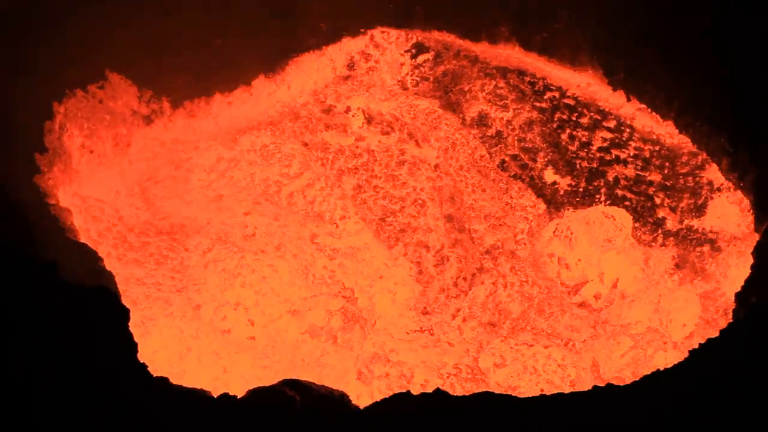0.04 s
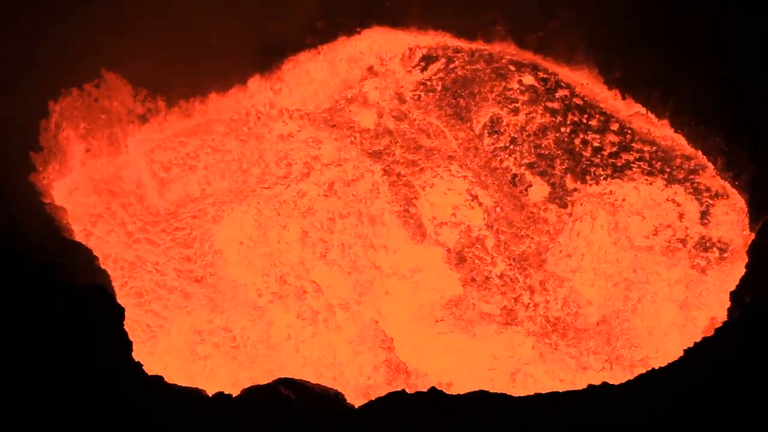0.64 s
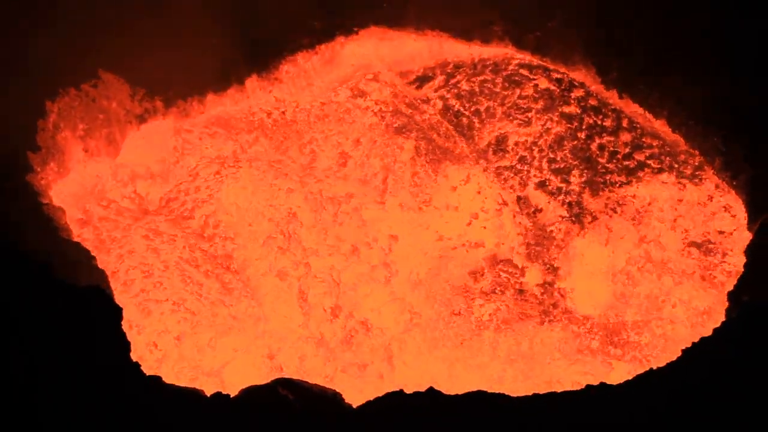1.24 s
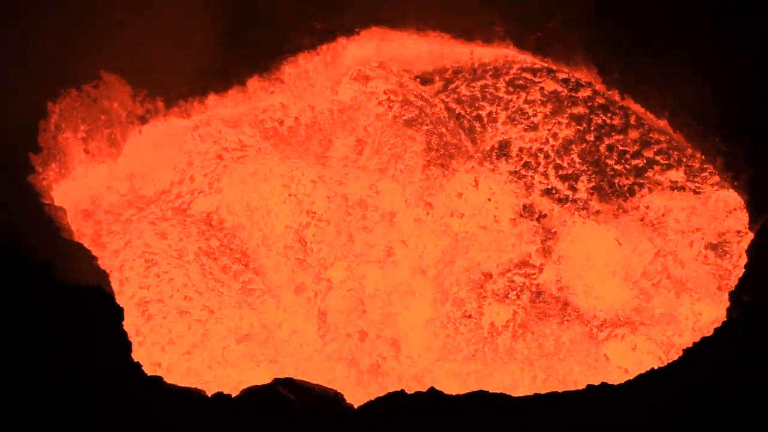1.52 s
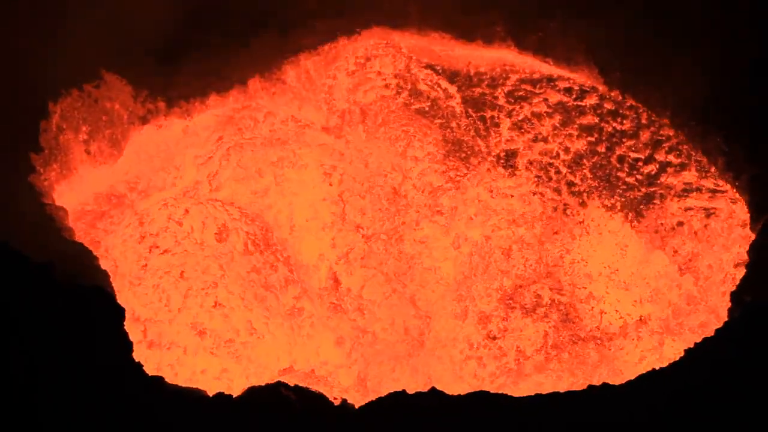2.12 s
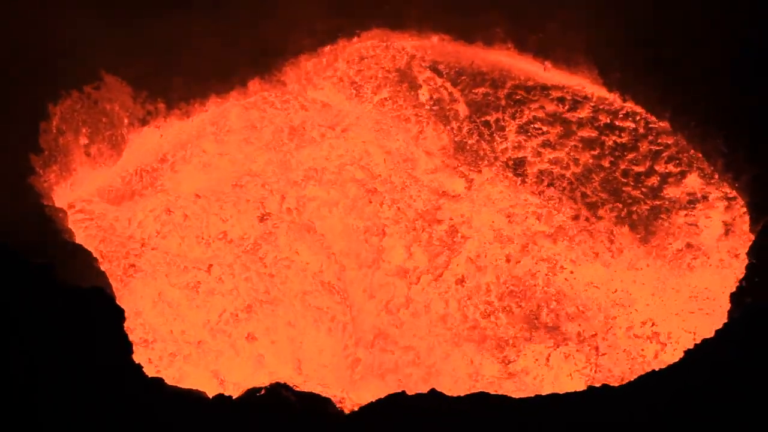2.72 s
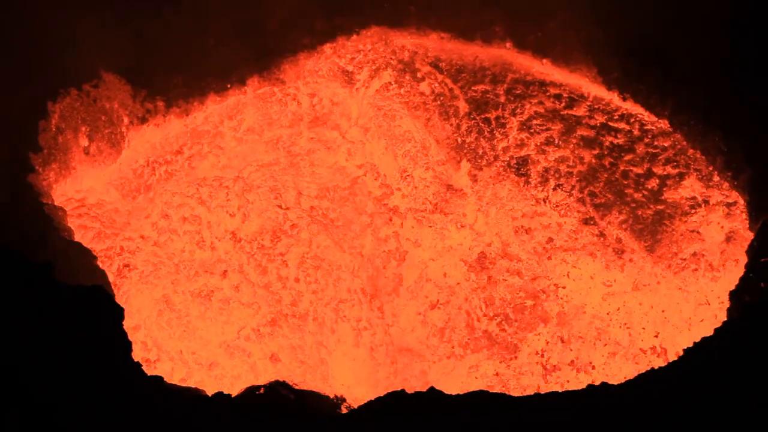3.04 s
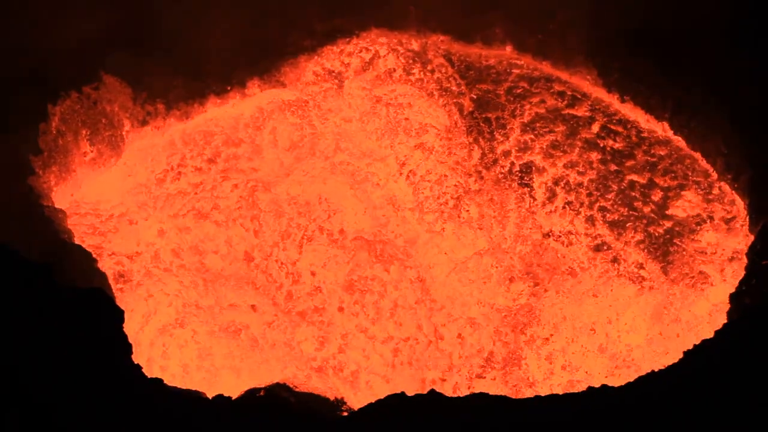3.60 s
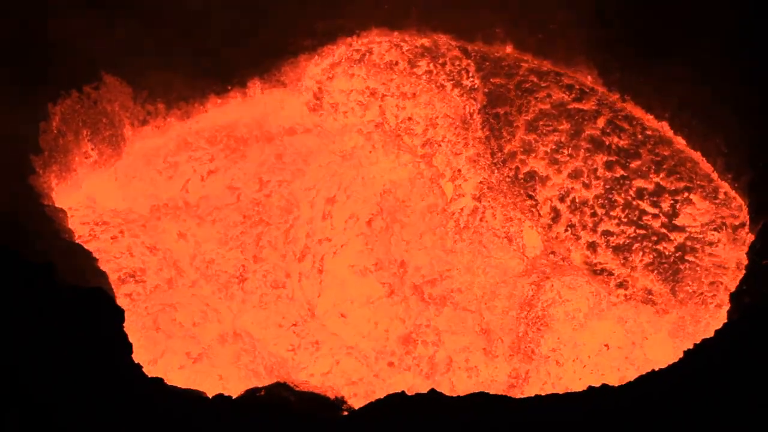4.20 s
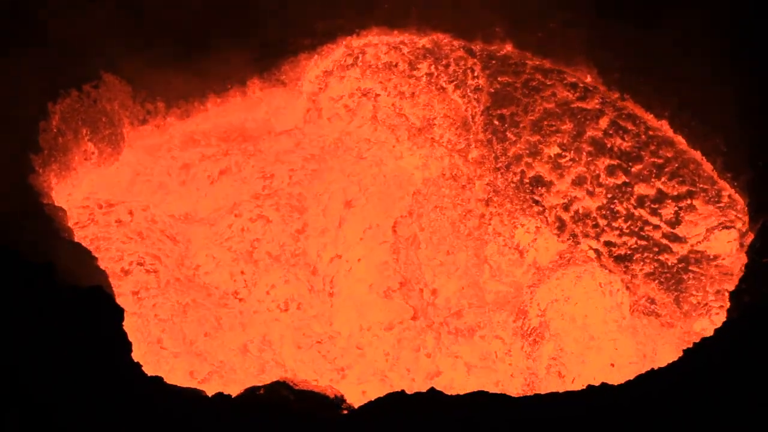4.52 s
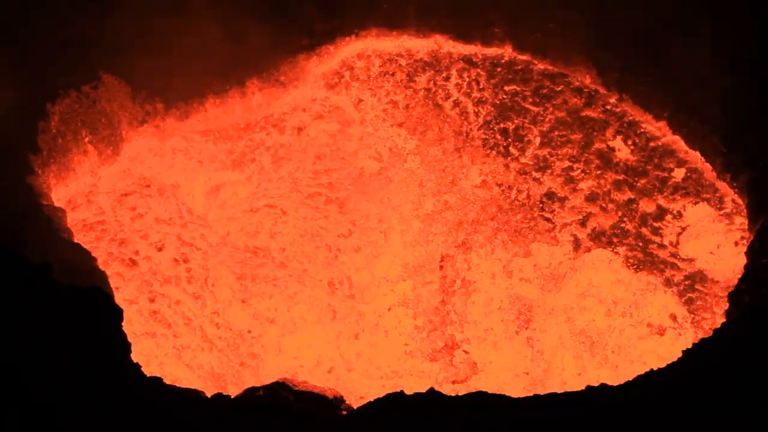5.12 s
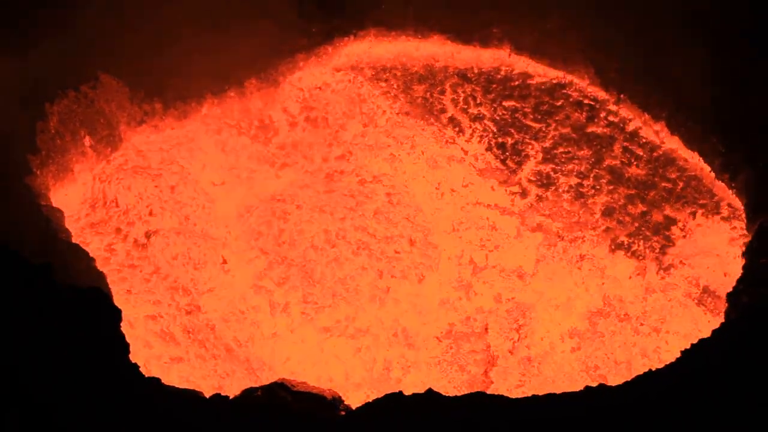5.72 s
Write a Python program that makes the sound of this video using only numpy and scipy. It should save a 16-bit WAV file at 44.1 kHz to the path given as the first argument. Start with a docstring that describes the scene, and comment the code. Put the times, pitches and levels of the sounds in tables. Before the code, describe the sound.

At the rim of a volcano crater, a lava lake churns with a low roar that swells in surges, with soft splashing on top. Wind rumbles on the microphone, building after a second and a half into hard, thumping gusts that push the lake back. The wind eases briefly, then returns at the end. Faint scuffs and ticks of loose grit sound close by, mostly on the left, over a thin hiss.

```python
"""Lava lake in the wind

A lava lake churns in its crater: bursting gas roars in surges, with splashes of melt on top.
Close by, mostly to the left, loose grit scuffs and ticks over a steady hiss.
Gusts rumble and thump on the microphone at the rim. The recorder turns everything down
under the strong gusts, and the hardest eddies (swirls of air) overload it."""
import sys
import numpy as np
from scipy import signal
from scipy.fft import rfft, irfft
from scipy.io import wavfile
from scipy.ndimage import uniform_filter1d, minimum_filter1d

SR = 44100
rng = np.random.default_rng(int(sys.argv[2]) if len(sys.argv) > 2 else 0)


def to_wav(sig):
    """Store sig (one row per channel, or 1-D mono) as 16-bit WAV at the path in sys.argv[1].

    Samples outside -1..1 are clipped; the rate is SR.
    """
    pcm = np.clip(np.atleast_2d(sig), -1, 1) * 32767
    pcm = np.round(pcm).astype(np.int16)
    wavfile.write(sys.argv[1], SR, pcm.T)  # frames by channels


N = 262395
T = np.arange(N) / SR
HZ = np.fft.rfftfreq(N, 1 / SR)

# The pitch range in which each named layer's level is set: lowest_hz, highest_hz
BANDS = {"wind": (0, 400), "flutter": (130, 600), "roar": (330, 1500), "splash": (1300, 4500),
         "hiss": (10500, 15800)}


def amp(db):
    """Turns decibels into a factor to multiply by."""
    return 10 ** (np.asarray(db) / 20)


def unit(x):
    """Scales a signal to an average (rms) level of 1."""
    return x / np.sqrt(np.mean(x ** 2) + 1e-20)


def curve(points):
    """Joins (pitch, value) points with straight lines on a scale of octaves."""
    pitch_hz, value = np.transpose(points)
    return np.interp(np.log(HZ + 1), np.log(pitch_hz + 1), value)


def add(mix, start_s, sound):
    """Mixes in a stereo sound at the given time."""
    part = mix[:, max(round(start_s * SR), 0):][:, :sound.shape[1]]
    part += sound[:, :part.shape[1]]


def pair(unrelated, likeness):
    """Makes left and right from two signals: likeness 0 is wide, 1 is centred."""
    likeness = np.clip(likeness, 0, .999)
    mid = unrelated[0] * np.sqrt((1 + likeness) / 2)
    side = unrelated[1] * np.sqrt((1 - likeness) / 2)
    return np.array([mid + side, mid - side])


def lean(left_db):
    """Gains that make the left side louder than the right by left_db."""
    return amp([[left_db / 2], [-left_db / 2]])


def coloured(noise, colour, likeness, band_hz):
    """Gives noise a tone colour and a stereo width, at level 1 within the band."""
    spectrum = pair(rfft(noise), likeness) * amp(curve(colour))
    inside = spectrum[:, (HZ >= band_hz[0]) & (HZ <= band_hz[1])]
    return irfft(spectrum, N) * N / np.linalg.norm(inside)


def white():
    """Two channels of white noise."""
    return rng.standard_normal((2, N))


def wander(rate_hz):
    """A smooth random wobble of level 1."""
    return unit(irfft(rfft(rng.standard_normal(N)) * np.exp(-(HZ / rate_hz) ** 2), N))


def steadied(x, span_s):
    """Evens out the level of noise over stretches longer than span_s."""
    window = np.hanning(max(int(span_s * SR), 64))
    power = signal.fftconvolve((x ** 2).mean(0), window, "same")
    power /= signal.fftconvolve(np.ones(N), window, "same")
    return x / np.sqrt(abs(power) + 1e-9)


def hiss():
    """A wide, smooth, steady hiss."""
    # Tone of the hiss: pitch_hz, level_db
    colour = [(500, -26.5), (3000, 3.5), (5500, 3), (8000, 2.5), (10500, 1), (13000, 1), (15700, 0),
              (16200, -8)]
    return coloured(white(), colour, likeness=0.15, band_hz=BANDS["hiss"]) * amp(-57) * lean(left_db=0.6)


def scuffs():
    """Sliding grit makes a short sputtering hiss that swells and fades."""
    # Slides of grit: peak_s, level_db, length_s, pitch_hz, width_octaves, left_minus_right_db
    slides = [(.230, -38, 0.032, 7600, 0.82, -3), (0.325, -39, 0.017, 4000, 0.93, -6),
              (1.419, -46, 0.15, 4800, .8, 0), (1.704, -35.5, .013, 2630, 1.06, 4),
              (1.737, -40, 0.024, 5000, .9, 1), (4.116, -36.5, 0.044, 3550, 2.7, 4),
              (4.739, -44, 0.24, 4200, 2.4, 3), (4.864, -47.5, 0.041, 6400, .6, 3),
              (5.143, -27.5, 0.022, 2920, 3.6, 5.5), (5.185, -37, .065, 3200, 1.6, 5),
              (5.263, -38, .014, 2400, 1.5, 1)]
    out = np.zeros((2, N))
    t = np.arange(2 ** 14) / SR
    hz, middle_s = np.fft.rfftfreq(len(t), 1 / SR), t.mean()
    for peak_s, level_db, length_s, pitch_hz, octaves, left_db in slides:
        sputter_db = 2.5 * unit(uniform_filter1d(rng.standard_normal(len(t)), size=60))
        grains = rng.standard_normal((2, len(t))) * amp(sputter_db)
        band = np.exp(-.5 * (np.log2((hz + 1) / pitch_hz) / octaves) ** 2) / np.sqrt(hz + 500)
        slide = unit(irfft(pair(rfft(grains), likeness=0.7) * band, len(t)))
        swell = np.exp(-2 * ((t - middle_s) / length_s) ** 2)
        add(out, peak_s - middle_s, amp(level_db) * slide * swell * lean(left_db))
    return out


def ticks():
    """Brittle grains crack: a few milliseconds of ring with a faint scatter after it."""
    # Single cracking grains: start_s, level_db, pitch_hz
    grains = [(1.048, -47, 3430), (1.169, -45, 5000), (1.215, -41.5, 4830), (1.419, -38, 2600),
              (1.703, -31.5, 2420), (1.752, -40, 4500), (3.863, -41, 4830), (4.098, -35.5, 2940),
              (4.685, -57, 3360), (4.705, -36, 2900), (4.73, -32, 3220), (4.75, -39, 4840),
              (4.774, -39, 2970), (5.144, -27.5, 1450), (5.171, -33, 3400), (5.192, -32, 2650),
              (5.247, -37, 2970), (5.266, -33, 2120), (5.319, -37, 4020), (5.456, -45, 5200)]
    out = np.zeros((2, N))
    t = np.arange(SR // 20) / SR
    decay = np.exp(-t / .0025) + .10 * np.exp(-t / .012)
    for start_s, level_db, pitch_hz in grains:
        crack = pair(rng.standard_normal((2, len(t))), likeness=0.72) * decay
        band_hz = [pitch_hz / 1.4, min(pitch_hz * 1.4, SR / 2.2)]
        body = signal.butter(2, band_hz, "bandpass", fs=SR, output="sos")
        ring = signal.sosfilt(body, crack) + 0.033 * crack
        opening_level = np.sqrt(np.mean(ring[:, t < .003] ** 2))
        add(out, start_s, amp(level_db) * ring / opening_level)
    return out * lean(left_db=10.5)


def grit():
    """Scuffs and ticks share one crisp tone colour."""
    # Tone of the grit: pitch_hz, gain_db
    colour = [(500, 0), (3100, -3.5), (3800, -9), (4600, -4), (5700, -8.5), (7900, -4), (9500, -8),
              (15500, -13)]
    return irfft(rfft(scuffs() + ticks()) * amp(curve(colour)), N)


def lake():
    """Bursting gas roars in the crater; dense splashes of melt ride on top."""
    # Surges of gas through the melt: peak_s, half_length_s, roar_rise_db, splash_rise_db
    surges = [(.0, .05, 4.5, 1), (0.31, 0.2, 4, 8), (1.048, 0.039, 2.5, 3), (1.5, 0.23, 2.8, 6),
              (2.046, 0.37, 0.5, 5), (2.534, 0.17, 10.5, 13), (3.74, 0.22, 5, 5.5), (4.11, 0.12, 5.5, 3),
              (4.503, 0.16, 2, -2.5), (4.923, 0.13, 4, 0), (5.39, 0.19, 4, 5.5), (5.82, 0.18, 6, 6)]
    # Tone of the roar: pitch_hz, level_db
    roar_colour = [(20, -9.5), (100, 5), (190, 13), (280, 5.5), (380, 2), (550, 0), (680, -5.5),
                   (820, -4.5), (1200, -10), (1800, -15.5), (3000, -24), (6000, -35), (16000, -71)]
    # Tone of the splashes: pitch_hz, level_db
    splash_colour = [(300, -8), (900, 2.5), (1600, 5), (2400, 0.5), (3200, -6.5), (3900, -10.5),
                     (4700, -12), (5700, -22.5), (7600, -24.5), (10000, -26.5), (16000, -26.5)]
    # How alike left and right are: pitch_hz, likeness (0 to 1)
    lake_likeness = [(100, 1), (600, 0.95), (1500, .93), (3000, 0.93), (8000, 0.97)]
    steady_roar_db, steady_splash_db, drops_per_s = -38.5, -50.5, 2500
    roar_rise_db, splash_rise_db = sum(np.outer(rises_db, np.exp(-((T - peak_s) / half_s) ** 2))
                                       for peak_s, half_s, *rises_db in surges)
    likeness = curve(lake_likeness)
    churn = wander(rate_hz=9.4)  # the boiling surface shakes roar and splashes together
    roar = coloured(white(), roar_colour, likeness, BANDS["roar"])
    roar *= amp(steady_roar_db + roar_rise_db + 0.16 * churn)
    drops = white() * (rng.random(N) < drops_per_s / SR)
    drops *= amp(7.7 * np.minimum(rng.exponential(1, N), 3))  # many soft, a few loud
    splash = coloured(white() + .5 * unit(drops), splash_colour, likeness, BANDS["splash"])
    splash *= amp(steady_splash_db + splash_rise_db + 1.5 * churn + .5 * wander(rate_hz=160))
    return roar * lean(left_db=2.0) + splash * lean(left_db=0.9)


def gusts():
    """Strength of the wind's three layers: each gust swells, holds and drops back into the breeze."""
    # The breeze between gusts: slow_eddies_db, fast_eddies_db, flutter_db
    breeze_db = (-25.5, -30, -43.5)
    # Gusts on the microphone: peak_s, half_length_s, slow_eddies_db, fast_eddies_db, flutter_db
    blasts = [(0.413, 0.049, -15, -21.5, -33), (0.713, 0.18, -16.5, -30, -45), (1.071, 0.11, -14, -27, -38),
              (1.325, 0.16, -20.5, -42, -56), (1.584, 0.14, -11.5, -12.5, -27), (1.897, 0.18, -8, -16, -26),
              (2.174, 0.098, -6.5, -14, -23.5), (2.427, 0.076, -3.5, -13.5, -20.5),
              (2.675, 0.16, -4.5, -12, -28), (2.978, 0.098, -4, -15.5, -23.5), (3.18, 0.1, -7, -3, -11.5),
              (3.395, 0.085, -3, -15, -25.5), (3.521, 0.12, -17, -9, -21), (3.786, 0.17, -11.5, -19, -58),
              (4.105, 0.056, -4, -15, -26.5), (4.234, 0.081, -4, -13, -22), (4.446, 0.16, -14.5, -18, -38),
              (4.81, 0.14, -21, -23.5, -54), (5.681, 0.098, -13.5, -15, -24.5),
              (5.792, 0.053, -4.5, -13.5, -16.5), (5.921, 0.063, -2.5, -11.5, -34)]
    squareness = 3.26  # 2 is a bell shape; more gives a flatter top and steeper sides
    power = amp(breeze_db)[:, None] ** 2 * np.ones(N)
    for peak_s, half_s, *levels_db in blasts:
        swell = np.exp(-np.minimum(abs((T - peak_s) / half_s), 2) ** squareness)
        power += (amp(levels_db)[:, None] * swell) ** 2
    return np.sqrt(power)


def wind():
    """Large eddies press on both microphone openings alike; each opening also flutters on its own."""
    # Tone of the slow eddies: pitch_hz, level_db
    slow_colour = [(5, 2.5), (15, -4), (28, -2), (52, -1), (72, -9.5), (110, -29.5), (250, -64.5),
                   (900, -100)]
    # Tone of the fast eddies: pitch_hz, level_db
    fast_colour = [(30, -19.5), (55, -10), (80, 0.5), (118, -4.5), (160, -11.5), (220, -19.5), (320, -31),
                   (500, -53.5), (1200, -63.5), (4000, -100)]
    # Tone of the flutter: pitch_hz, level_db
    flutter_colour = [(50, -22), (115, 0), (190, -1), (300, -10), (450, -26), (800, -40.5), (2000, -55),
                      (6000, -90.5)]
    # How alike left and right are: pitch_hz, likeness (0 to 1)
    wind_likeness = [(20, 1), (60, 0.95), (125, 0.92), (250, 1), (600, 0.36)]
    slow_gain, fast_gain, flutter_gain = gusts()
    likeness = curve(wind_likeness)
    slow = steadied(coloured(white(), slow_colour, likeness, BANDS["wind"]), span_s=0.034) * slow_gain
    fast = steadied(coloured(white(), fast_colour, likeness, BANDS["wind"]), span_s=0.16) * fast_gain
    flutter = steadied(coloured(white(), flutter_colour, 0, BANDS["flutter"]), span_s=0.08)
    flutter *= flutter_gain
    clumps_db = 1.8 * wander(rate_hz=53)  # rough air arrives in clumps
    return (slow + fast * lean(left_db=0.8) + flutter * lean(left_db=4.5)) * amp(clumps_db)


def buffets(airflow):
    """The core of a hard eddy shoves the airflow aside: one sharp pull between two weaker pushes."""
    # The hardest single eddies: peak_s, pull_db, pitch_hz
    hard_eddies = [(.8, -7.5, 38), (1.05, -4.5, 49.5), (1.531, 4.5, 66), (1.654, 6.5, 82),
                   (1.757, 6.5, 63.4), (1.941, 2, 46), (1.985, 5, 66), (2.168, 3.5, 56), (2.426, 4, 49),
                   (2.592, 8.5, 65), (2.8, 1, 116), (3.01, 10, 72), (3.137, 11.5, 71), (3.596, 5, 71),
                   (4.066, 3, 50.7), (4.147, 2, 51.5), (4.25, 7, 57), (5.777, 4, 41.3), (5.81, 6.5, 47.5)]
    core, thumps = np.zeros(N), np.zeros(N)
    for peak_s, pull_db, pitch_hz in hard_eddies:
        offset_squared = np.minimum((np.pi * pitch_hz * (T - peak_s)) ** 2, 200)
        thumps -= amp(pull_db) * (1 - 2 * offset_squared) * np.exp(-offset_squared)
        core = np.maximum(core, np.exp(-offset_squared / 4))
    return airflow * (1 - 0.61 * core) + thumps


def gain_control(x):
    """Turns everything down while the average level is too high, so gusts push the lake back."""
    ceiling_db, average_s, glide_s = -11, 0.23, 0.12
    memory = np.exp(-1 / (average_s * SR))
    average_power = signal.lfilter([1 - memory], [1, -memory], (x ** 2).mean(0))
    over_db = np.maximum(10 * np.log10(average_power + 1e-12) - ceiling_db, 0)
    return x * amp(-uniform_filter1d(over_db, size=int(glide_s * SR)))


def limiter(x):
    """Catches the strongest swings at full scale, then lets go at a steady rate."""
    recovery_db_per_s = 56
    safe_gain = 1 / np.maximum(abs(x).max(0), 1)
    over_db = -20 * np.log10(minimum_filter1d(safe_gain, size=49))
    recovered_db = recovery_db_per_s * T
    held_db = np.maximum.accumulate(over_db + recovered_db) - recovered_db
    window = np.hanning(97)
    return x * amp(-signal.oaconvolve(held_db, window / window.sum(), "same"))


def scene():
    """Wind, lake, hiss and grit together at the crater's rim."""
    return buffets(wind()) + lake() + hiss() + grit()


def record(dry):
    """The recorder: slow gain control, a fast limiter, then a cut of the highest treble."""
    edge_fades = signal.windows.tukey(N, .002)
    limited = limiter(gain_control(dry)) * edge_fades
    treble_cut = signal.firwin(511, cutoff=16050, window=("kaiser", 9), fs=SR)
    return signal.oaconvolve(limited, treble_cut[None], "same")


dry = scene()
out = record(dry)
to_wav(out)
```